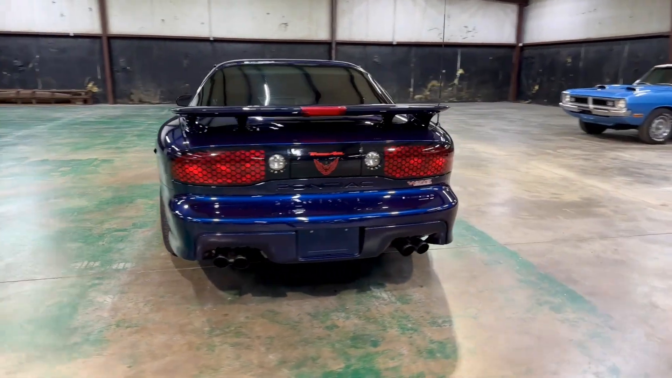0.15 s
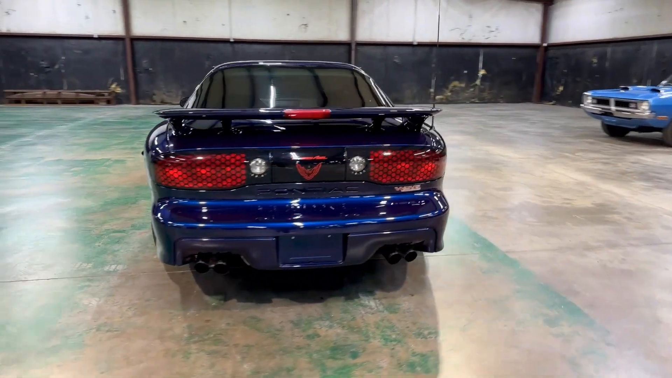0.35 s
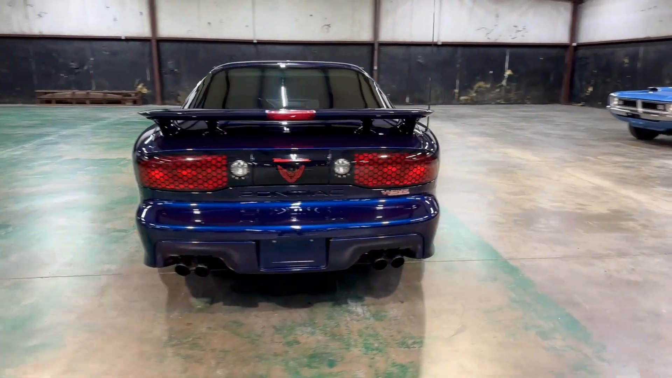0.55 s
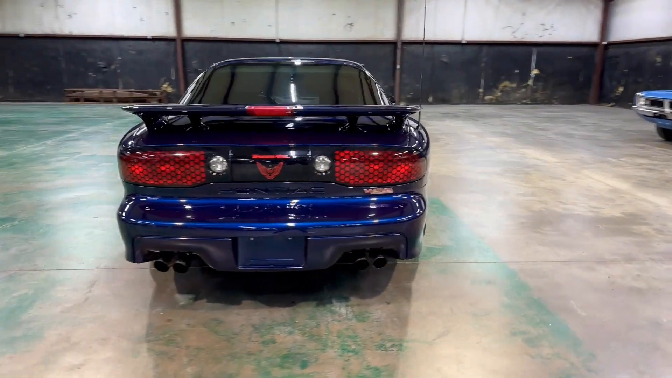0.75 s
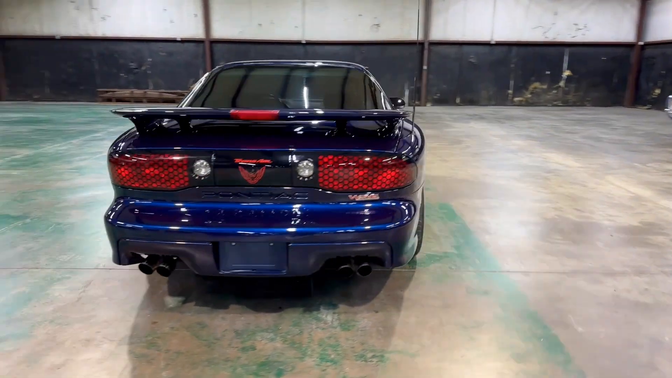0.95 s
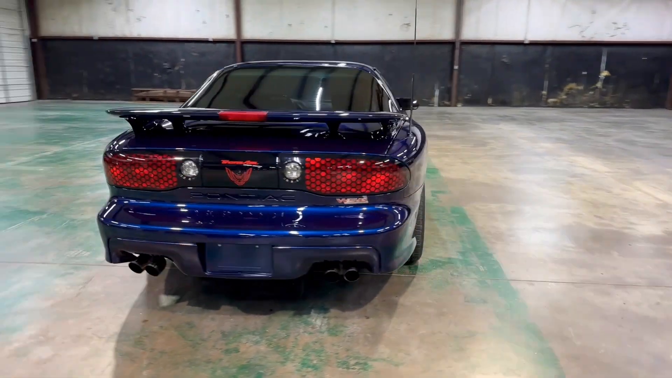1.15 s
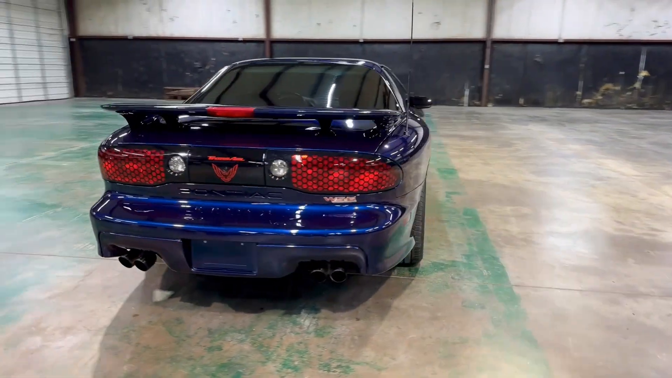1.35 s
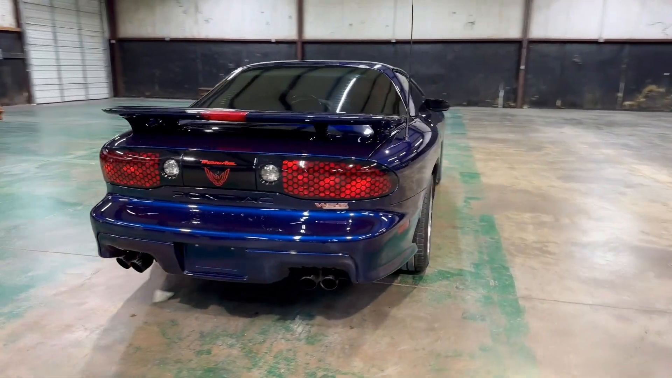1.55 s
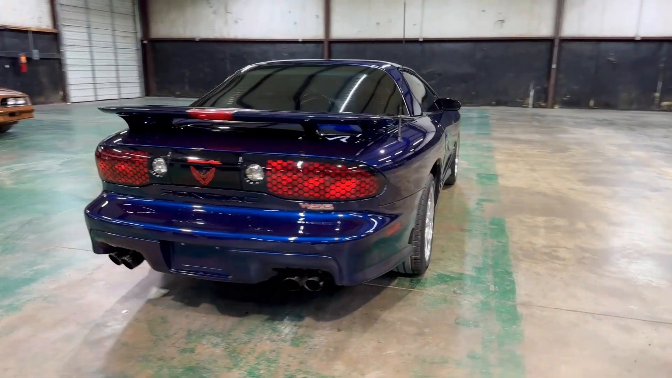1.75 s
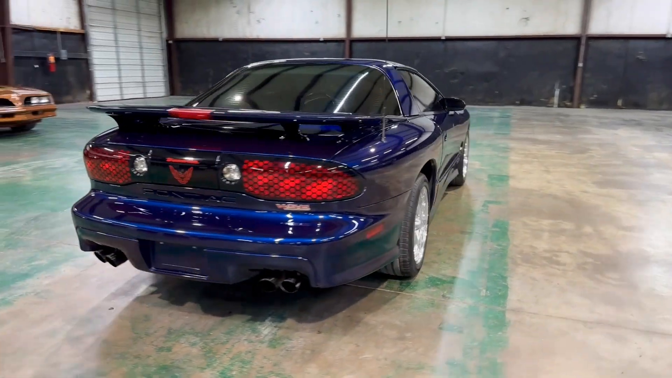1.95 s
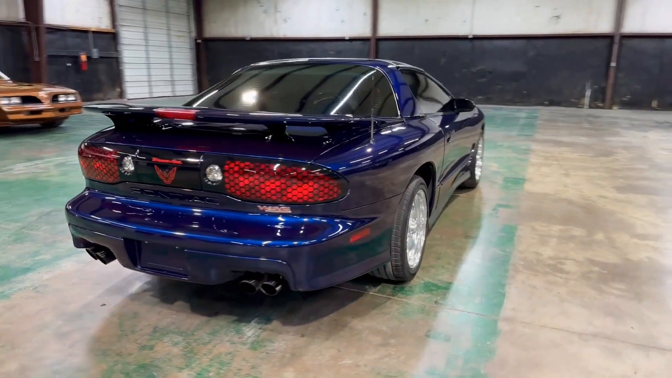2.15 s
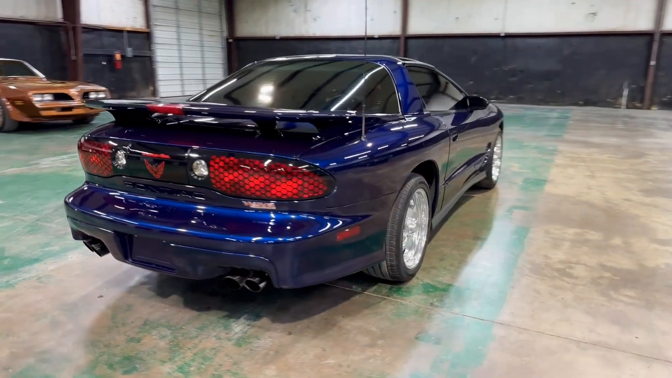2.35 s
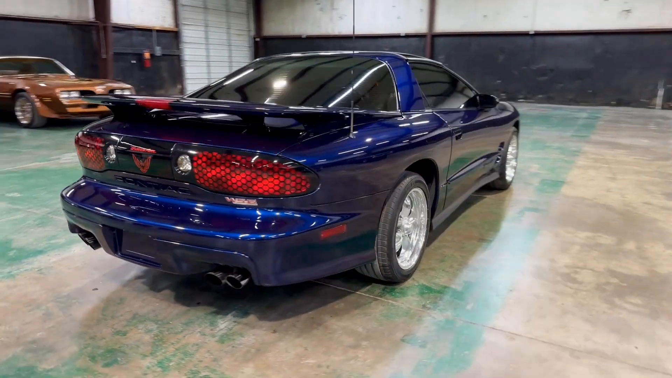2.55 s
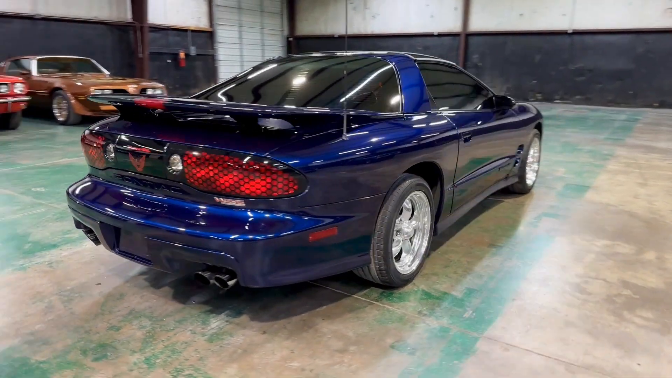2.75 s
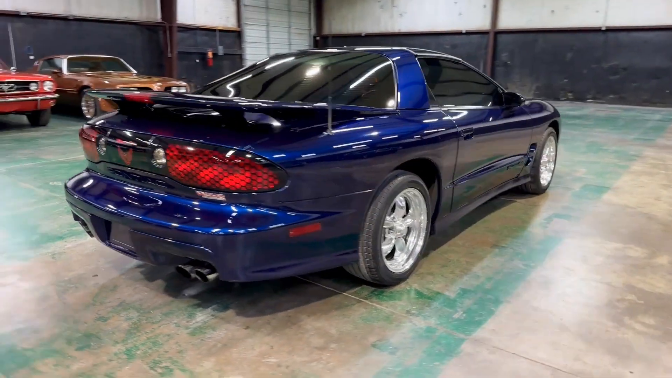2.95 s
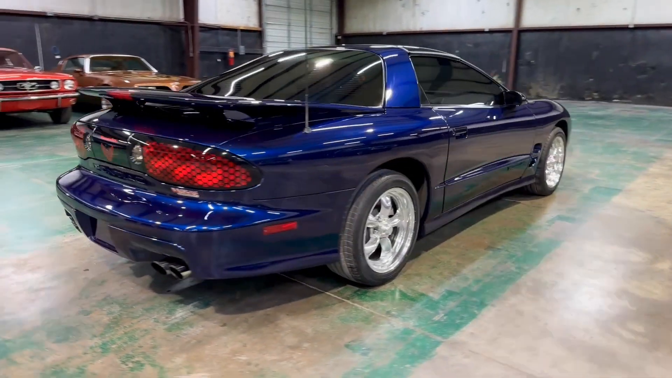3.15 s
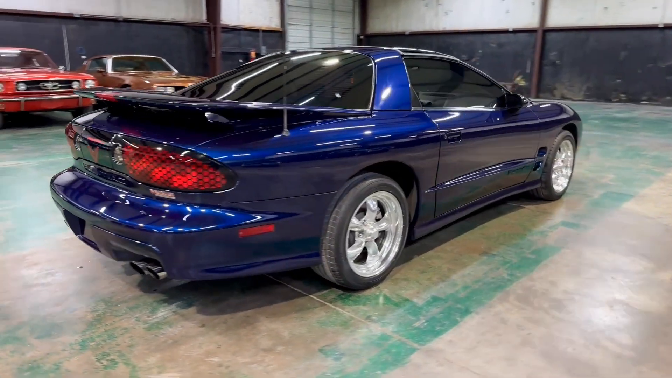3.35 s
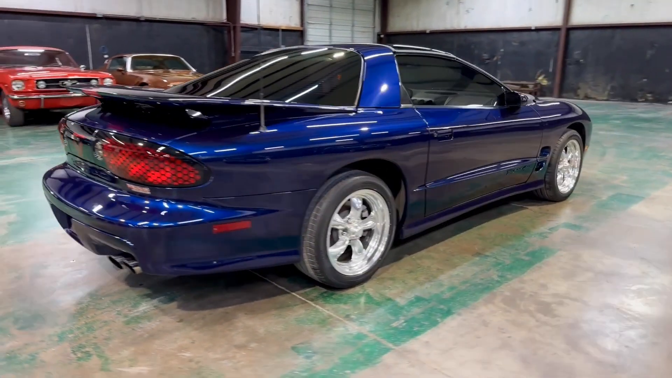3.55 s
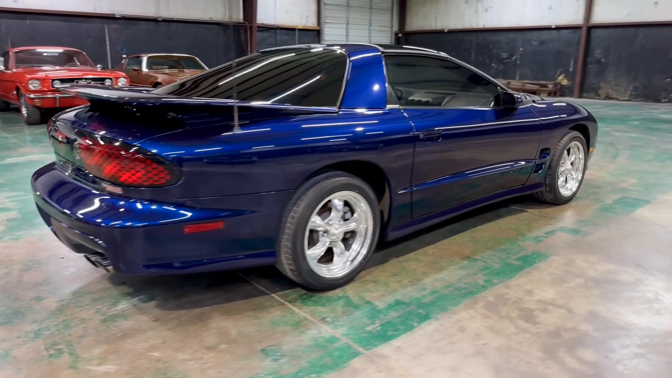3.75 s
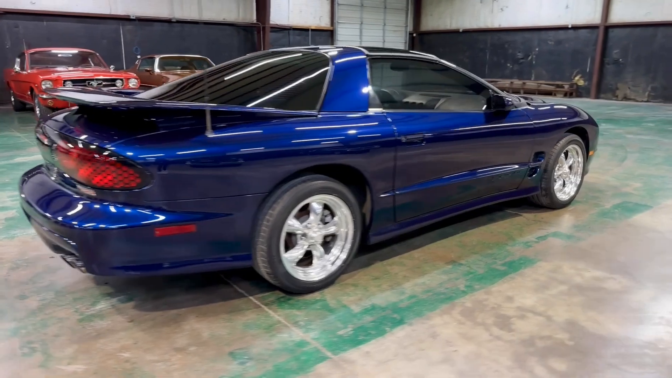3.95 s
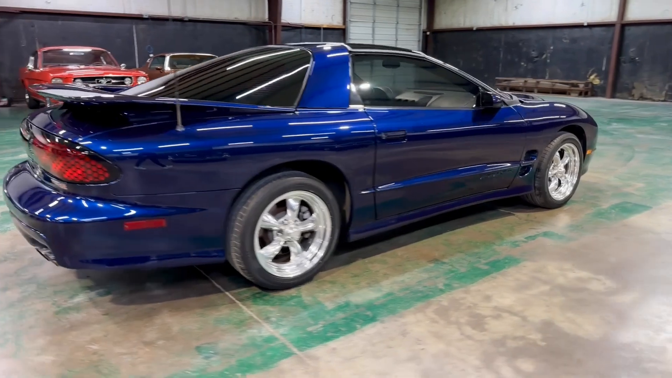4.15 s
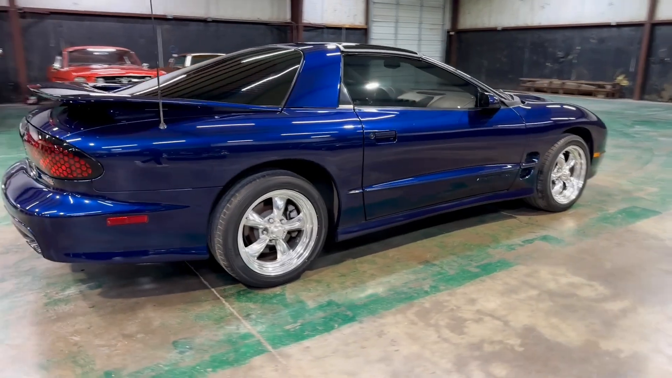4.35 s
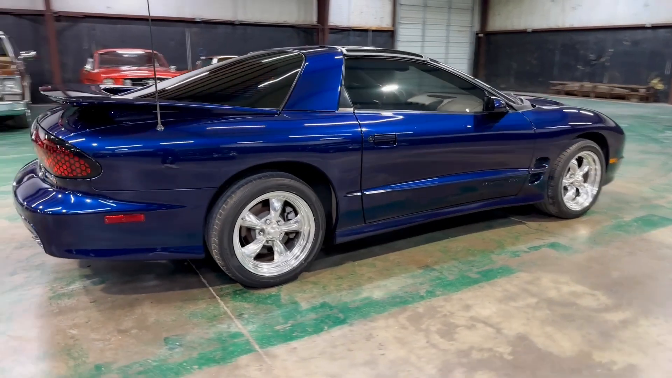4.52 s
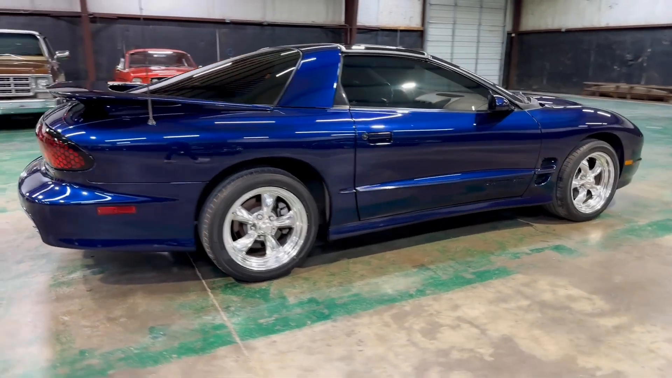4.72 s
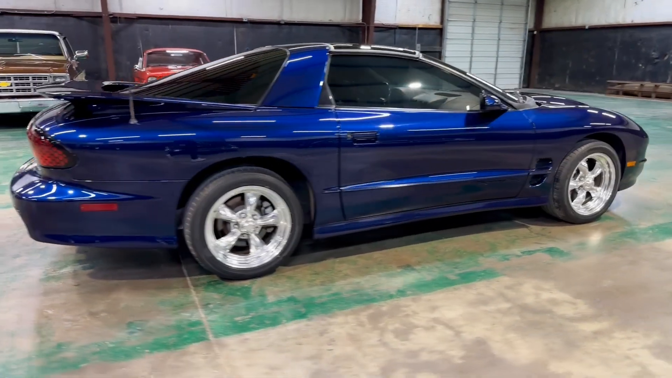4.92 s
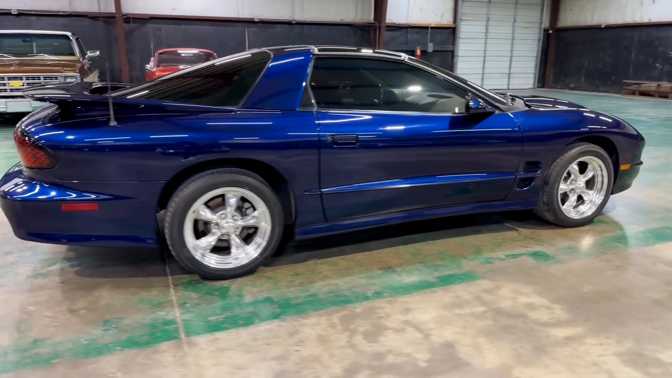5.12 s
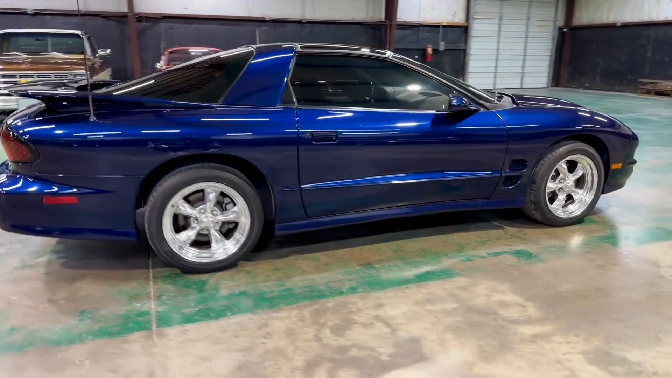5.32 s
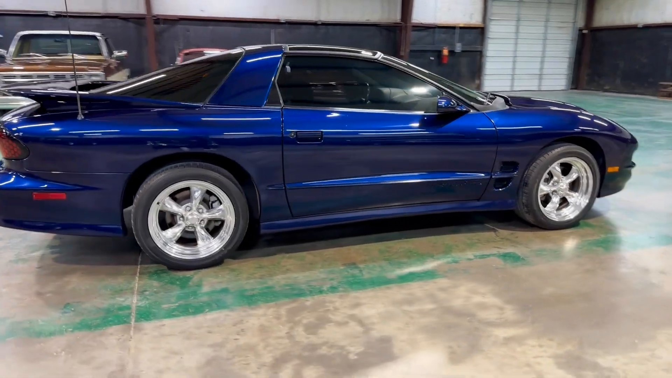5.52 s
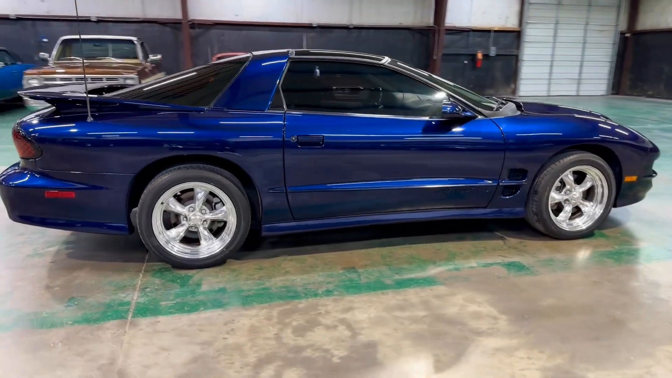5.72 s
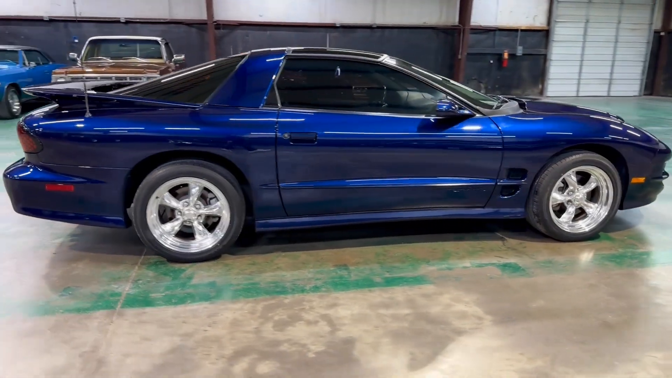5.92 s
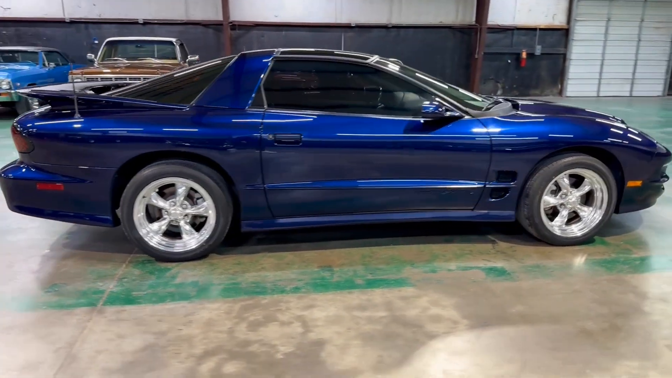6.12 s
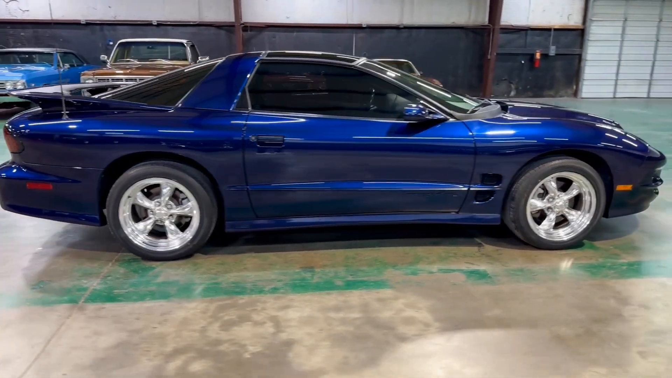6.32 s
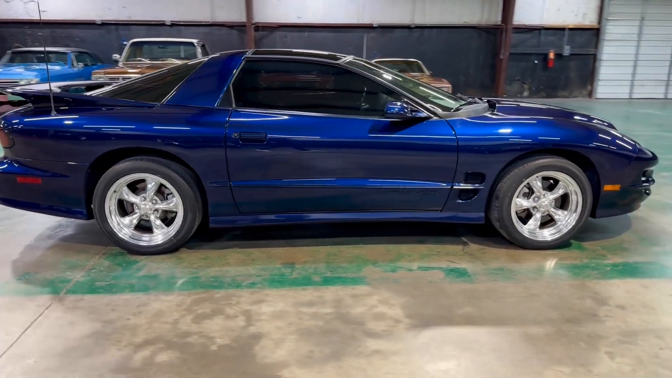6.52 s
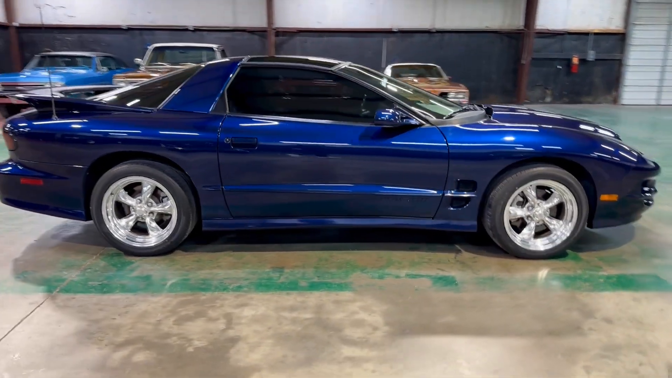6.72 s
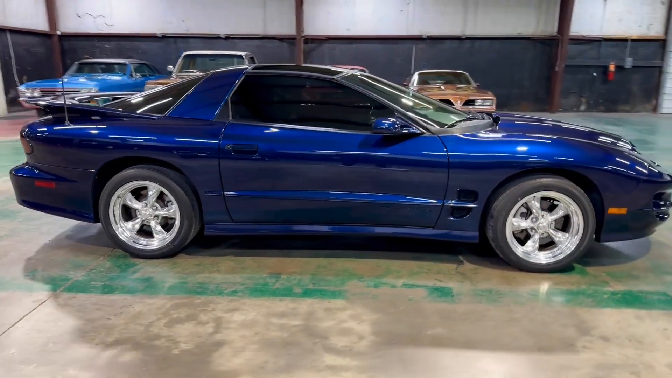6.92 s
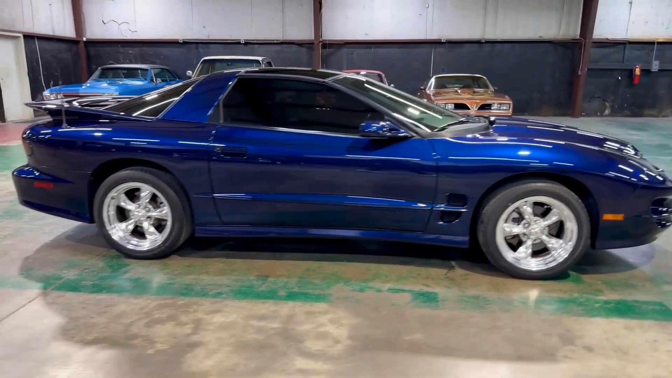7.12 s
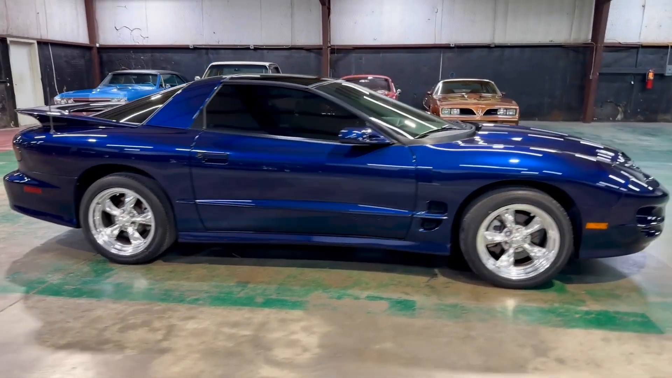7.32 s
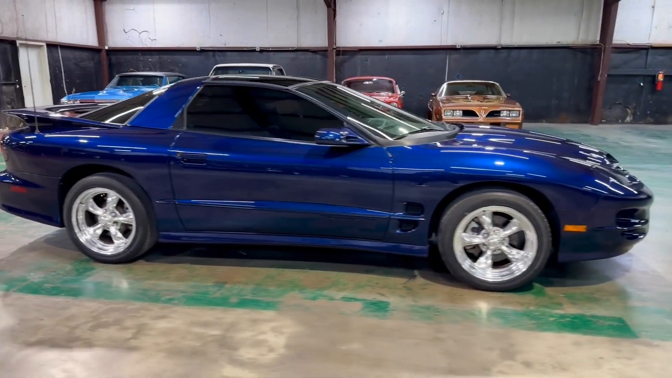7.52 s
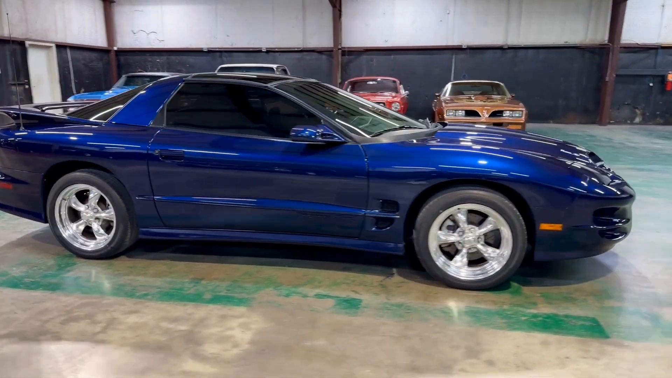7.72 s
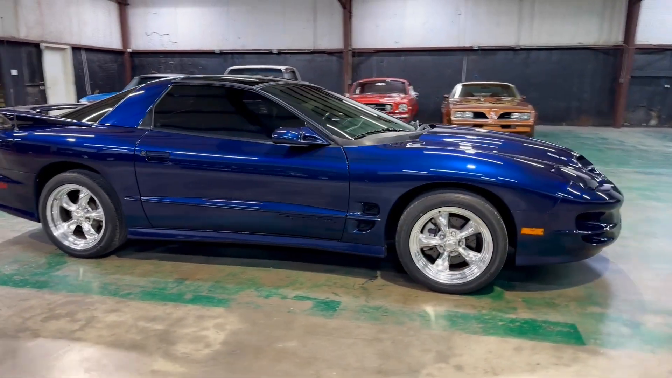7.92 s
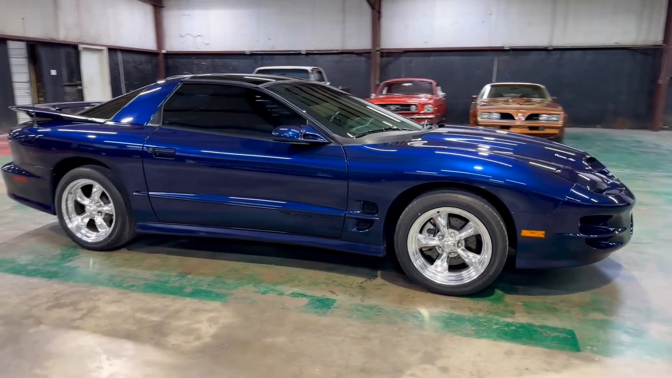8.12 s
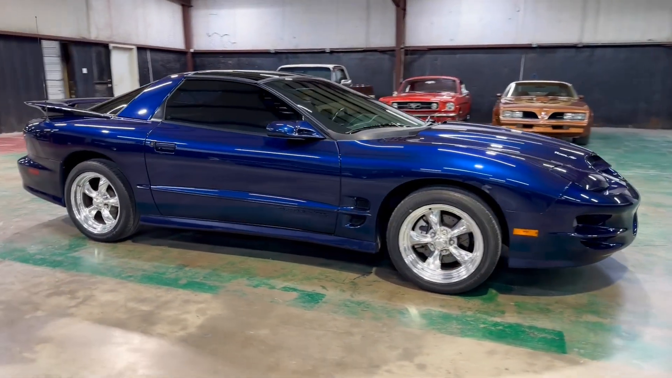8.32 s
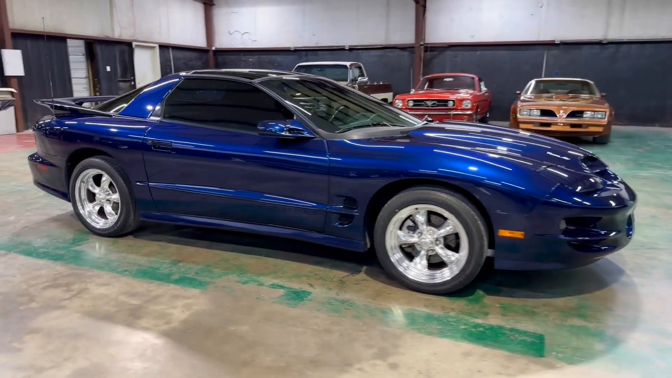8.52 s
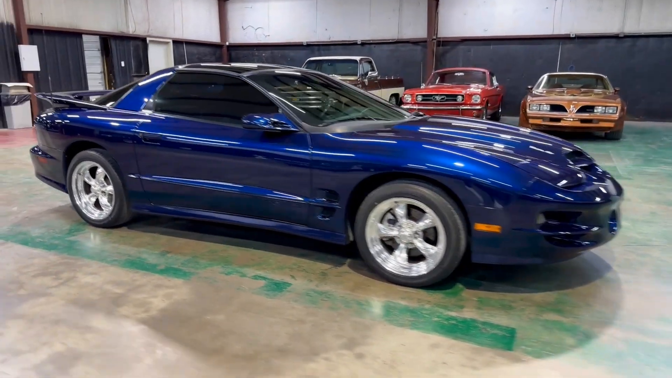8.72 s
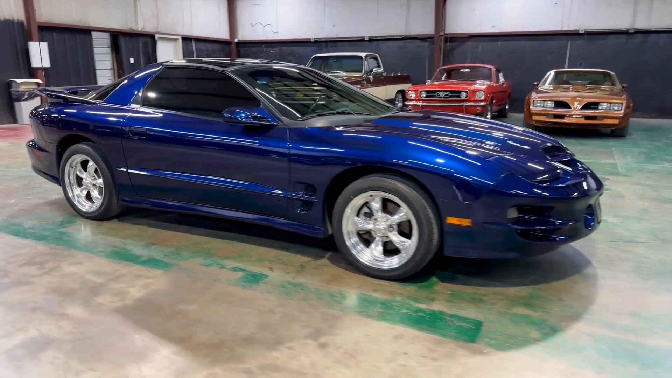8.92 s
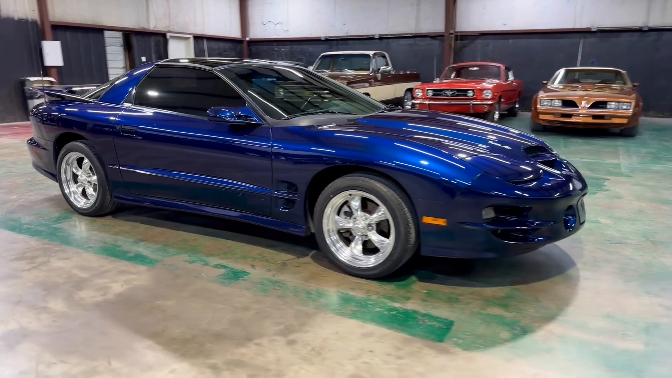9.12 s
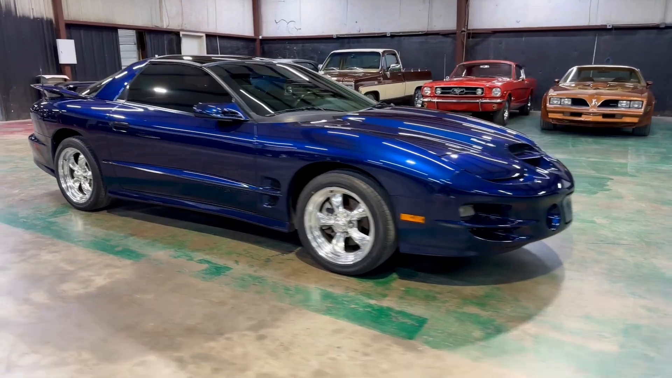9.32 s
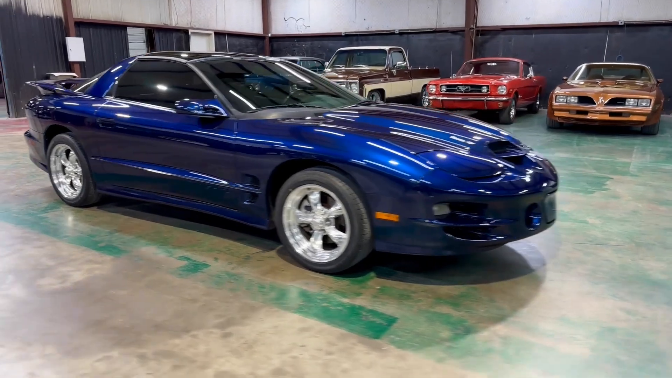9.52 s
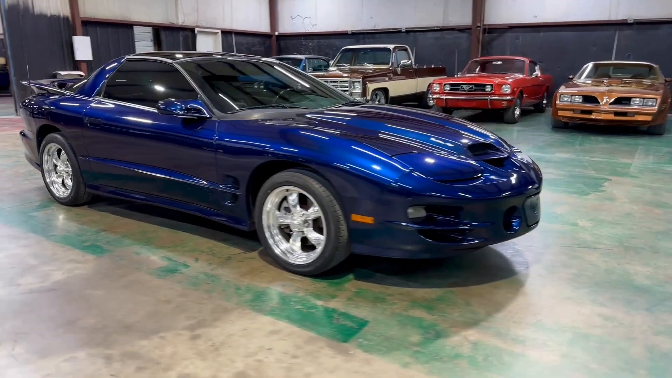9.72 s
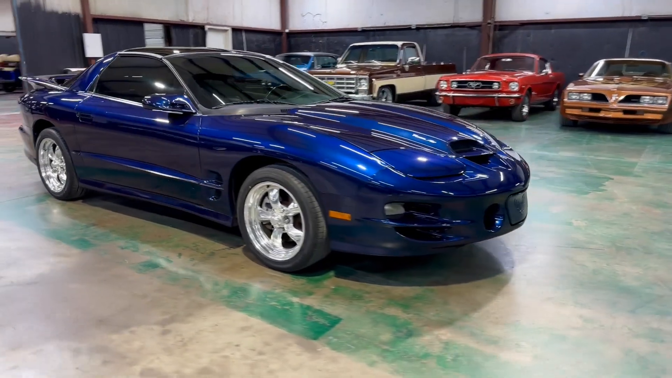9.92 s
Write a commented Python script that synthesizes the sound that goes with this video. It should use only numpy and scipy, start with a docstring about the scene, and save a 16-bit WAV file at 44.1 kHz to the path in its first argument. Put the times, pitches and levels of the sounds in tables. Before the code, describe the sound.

A V8 sports car idles steadily in a hard-floored showroom with a slight echo. The microphone starts behind the tailpipes, where the exhaust is a deep, loping boom, then moves along the side towards the nose. The rumble gradually weakens while belt whirr, hiss and light valve ticking become clearer. A few faint shoe scuffs come in the middle and near the end.

```python
"""A cross-plane V8 idles through a sports exhaust; the microphone walks from tail to nose.
Uneven blow-down pulses ring the pipes and lope once a cycle over a deep firing boom.
Gas spits at the tips. Valves tick and the belt drive hisses, louder towards the bonnet.
The hard-floored showroom adds echoes and standing waves; shoes scuff, air rocks the microphone."""
import sys
import numpy as np
from scipy import signal
from scipy.fft import rfft, irfft, next_fast_len
from scipy.io import wavfile
from scipy.ndimage import uniform_filter1d

SR = 44100
rng = np.random.default_rng(int(sys.argv[2]) if len(sys.argv) > 2 else 0)


def log_audio(samples):
    """Write samples as a 16-bit WAV file to the path given in sys.argv[1]."""
    # one column per channel
    frames = np.atleast_2d(samples).T
    # limit to full scale, then quantise
    limited = np.clip(frames, -1, 1)
    pcm = np.round(limited * 32767).astype(np.int16)
    wavfile.write(sys.argv[1], SR, pcm)


N = 439677
TIME_S = np.arange(N) / SR
N_FFT = next_fast_len(N + 2 * SR)
BINS_HZ = np.arange(N_FFT // 2 + 1) * SR / N_FFT + 1e-3

# idle speed (time [s], firing rate [Hz])
FIRING_RATE = [(0, 61.83), (2.2, 61.41), (3.3, 61.89), (4.7, 60.54), (5.2, 61.29), (9.97, 60.93)]
# cylinders in firing order (pulse lead [ms], relative level [dB])
CYLINDER_PULSES = [(1.9, -1.9), (1.8, -4.4), (-1.6, -2.8), (-1.6, -3.8), (1.7, -4.1), (1, -2.1), (.6, -2),
                   (1.6, 2.5)]
# pipe and silencer modes (centre [Hz], width [Hz], relative gain [dB])
PIPE_MODES = [(46.8, 10, 0), (78, 10, -10), (109, 31, -9), (145.6, 22, -5), (180.1, 10, -.6),
              (187.6, 10, -6), (225.4, 10, -3.8), (236.4, 10, -5), (267, 15, -13.7), (292, 22, -15.5),
              (327.6, 21, -14.5), (382, 25, -26), (440, 22, -20.5), (484, 28, -23.5)]
# travel of each pipe mode via pipe, floor and walls (delay [ms])
MODE_DELAYS_MS = [44.2, 42.2, 45.2, 43.1, 43.9, 41.9, 46.6, 45.4, 48.4, 24.9, 18, 55, 17.6, 12.8]
# exhaust bands (centre [Hz], base level at 1 m [dB], tail-to-nose change [dB], bank cancellation [0-1])
EXHAUST_BANDS = [(85, -22.5, 1, 0), (148, -28.5, 8, 0.35), (200, -24.5, -.5, 0.64),
                 (240, -26.5, -1.5, 0.85), (318.5, -27.5, 0.5, 0.91), (385, -38.2, -6, 0.2),
                 (486, -34.5, -13, 0.58)]
# gas whistle at the tips (centre [Hz], width [Hz], relative level [dB])
GAS_BANDS = [(8700, 2000, 1), (10400, 2000, -4), (12700, 2600, -7.5)]
# engine bay at the microphone, before trim (time [s], whirr [dB], hiss [dB])
BAY_LEVELS = [(0.1, -44.5, -43), (0.88, -43.5, -44.5), (4.99, -43, -40.5), (7.81, -42.5, -40),
              (9.44, -43.5, -38.5), (9.85, -42.5, -37.5)]
# belt whirr (frequency [Hz], relative density [dB])
WHIRR_SPECTRUM = [(250, -15.5), (450, 4.5), (600, -4), (740, -2.5), (850, 0.5), (1030, 0.5), (1170, -1),
                  (1450, -4.5), (2200, -14.5), (4000, -46.5)]
# bay hiss (frequency [Hz], relative density [dB])
HISS_SPECTRUM = [(600, -22), (1400, -4), (2200, 0.5), (3100, 1), (4200, 0.5), (5200, -2.5), (5700, -8),
                 (6700, -9.5), (7300, -12.5), (8100, -13.5), (10000, -21.5), (11700, -28), (13000, -29),
                 (15600, -43.5)]
# covers, injectors, pulleys (centre [Hz], width [Hz], gain at tail [dB], tail-to-nose change [dB])
METAL_MODES = [(726, 65, -1.5, 3), (1157, 38, -3, 0), (1745, 19, -2.5, 7), (1945, 24, 0, 2.5),
               (3514, 40, -10.5, 9.5), (3816, 79, -3.5, 5), (4476, 24, 0, 5), (4965, 60, -5.5, 2),
               (6630, 200, -3.5, 5)]
# pulleys singing out (time [s], half-length [s], pitch [Hz], lift [dB])
PULLEY_SWELLS = [(3.38, .1, 4505, 6), (3.6, .2, 3800, 5), (4.15, .2, 1160, 5), (5.77, .08, 4505, 6),
                 (6.2, .2, 1940, 5), (6.36, .08, 4505, 8), (7, .08, 3800, 5), (8.35, .3, 1940, 7),
                 (9.05, .15, 3500, 6), (9.5, .35, 4505, 4), (9.7, .2, 3800, 4), (9.7, .2, 6580, 5)]
# shoe strokes (time [s], level [dB], decay [s])
SHOE_STROKES = [(3.922, -41, 0.015), (5.228, -36.5, 0.026), (5.49, -38.5, 0.023), (6.4, -39, 0.028),
                (8.887, -41, .012), (9.675, -32.5, 0.01)]
# sole on concrete (frequency [Hz], relative density [dB])
SHOE_SPECTRUM = [(1200, -25), (2300, 11), (3100, 18), (4200, -28), (9000, -21), (15000, -37)]
# air on the microphone (frequency [Hz], relative density [dB])
BUFFET_SPECTRUM = [(2, -14.5), (5, 0.5), (10, 0), (14, -20.5), (19, -13.5), (35, -22.5), (50, -16),
                   (70, -35.5), (200, -78)]
# microphone path (time [s], distance from tips [m], bearing from straight behind [deg])
MIC_PATH = [(0, 2.2, -8.5), (1.1, 2.1, 12), (2, 2.22, 31), (4.3, 2.25, 68.5), (7, 3.86, 92),
            (9.97, 7.3, 158.5)]
# hall nodes and crests on that path (frequency [Hz], time [s], half-width [s], change [dB])
HALL_NODES = [(61, 3.3, 1.0, -4), (61, 5.85, 1.2, -2.5), (122, 4.16, 0.91, -7), (122, 7.04, 1.12, -27),
              (122, 8.76, 0.68, -11), (148, 6, 2.1, -8), (190, 4.1, 0.55, -1.5), (190, 6.3, 0.56, 4.5),
              (240, 4.4, 0.43, 2), (480, 0.84, .3, 2.5), (480, 1.8, .3, -4.5), (480, 5.4, 0.33, 2)]


def blowdown(firings, jitter_ms=.1, scatter_db=.8):
    """One pulse a firing; unequal headers give each cylinder its own delay and strength."""
    times_s = crank_times_s(firings, 1)
    cylinder = (1 + np.arange(len(times_s))) % len(CYLINDER_PULSES)
    lead_ms, level_db = np.array(CYLINDER_PULSES)[cylinder].T
    jitter, scatter = rng.standard_normal((len(times_s), 2)).T
    return clicks(times_s - (lead_ms + jitter_ms * jitter) / 1000, undb(level_db + scatter_db * scatter))


def exhaust(pulses, idle_hz):
    """Pulses and their turbulence ring the pipes; each band beams differently around the car."""
    turbulence = unit(fade(pulses, decay_s=.0077) * noise())
    pipes = sum(undb(db) * resonance(hz, width_hz) * np.exp(-2j * np.pi * BINS_HZ * delay_ms / 1000)
                for (hz, width_hz, db), delay_ms in zip(PIPE_MODES, MODE_DELAYS_MS))
    wet_db = np.interp(TIME_S, [5, 9], [-24, -10])  # more hall as the tips fall behind
    ring = hall(shape(unit(pulses) + undb(-19) * turbulence, pipes), wet_db)
    edges_hz = [30, 130, 165, 212, 272, 350, 420, 560]
    lowpasses = [1 / (1 + (BINS_HZ / hz) ** 16) for hz in edges_hz]
    # notched at the firing rate and its octave, where the boom's two tones sound
    notches = np.prod([1 - np.exp(-((BINS_HZ - k * idle_hz) / 4) ** 4) for k in (1, 2)], axis=0)
    bands = [unit(shape(ring, bandpass * notches)) for bandpass in np.diff(lowpasses, axis=0)]
    return sum(band * from_tips(db + nose_db * towards_nose()) * twin_pipes(hz, cancel) * hall_gain(hz)
               for band, (hz, db, nose_db, cancel) in zip(bands, EXHAUST_BANDS))


def boom(firings, idle_hz):
    """Mean gas flow pulses at the firing rate and its octave; combustion wavers a little."""
    phase_rad = 2 * np.pi * (firings - .09 + .014 * drift(18))

    def tone(harmonic, base_db, beam_db, nose_db):
        level_db = base_db + beam_db * in_beam(half_width_deg=38) + nose_db * towards_nose()
        gain = undb(level_db + .51 * drift(16)) * hall_gain(harmonic * idle_hz)
        return np.sqrt(2) * gain * np.cos(harmonic * phase_rad)

    fundamental = tone(1, base_db=-21.5, beam_db=3.2, nose_db=-4)
    octave = tone(2, base_db=-16, beam_db=4.17, nose_db=-8.5)
    return fundamental + octave


def spit(firings, at_1m_db=-61.5, beam_db=7, jitter_s=.004, scatter_db=2.2, colour_db=3.2):
    """Gas patters at the tips with each firing; every puff has its own strength and colour."""
    times_s = crank_times_s(firings, 1)
    count = len(times_s)
    times_s += jitter_s * rng.uniform(-1, 1, count)
    strength_db = scatter_db * noise(count)
    patter = 0
    for hz, width_hz, db in GAS_BANDS:
        puffs = fade(clicks(times_s, undb(strength_db + colour_db * noise(count))), decay_s=.004)
        patter += undb(db) * unit(shape(puffs * noise(), resonance(hz, width_hz) ** 2))
    return unit(hall(patter, wet_db=-7)) * from_tips(at_1m_db + beam_db * in_beam(half_width_deg=26))


def engine_bay(firings, tick_db=-6.5, hiss_trim_db=.2, whirr_trim_db=1.04):
    """Valves and injectors tick over belt and intake hiss; metal parts ring along."""
    whirr_db, hiss_db = curves(BAY_LEVELS)
    ticks = undb(tick_db) * valves(firings)
    belt = belt_gain(firings)
    hiss = shape(hall(belt * noise() + ticks, wet_db=-9), colour(HISS_SPECTRUM))
    rough_belt = belt * noise() * undb(.35 * np.cos(2 * np.pi * firings) + .7 * drift(35))
    whirr = shape(rough_belt, colour(WHIRR_SPECTRUM))
    bay = unit(hiss) * undb(hiss_db + hiss_trim_db) + unit(whirr) * undb(whirr_db + whirr_trim_db)
    return bay + metal_ring(bay) + injectors(firings) * undb(hiss_db - 30)


def valves(firings, offset_s=.002, scatter_db=4.5):
    """Two ticks a firing; every valve seats at its own crank angle."""
    times_s = crank_times_s(firings, 2)
    valve_count = 2 * len(CYLINDER_PULSES)
    times_s += offset_s * noise(valve_count)[np.arange(len(times_s)) % valve_count]
    impacts = clicks(times_s, undb(scatter_db * noise(len(times_s))))
    return unit(fade(impacts, decay_s=.0071) * noise())


def belt_gain(firings, swish_db=.5, flutter_db=.46):
    """The belt swishes once a trip round the pulleys and flutters three times an engine cycle."""
    swish = np.cos(2 * np.pi * firings / 20.5)
    flutter = np.cos(2 * np.pi * firings * 3 / 8)
    return undb(swish_db * swish + flutter_db * flutter + .21 * drift(11))


def metal_ring(bay):
    """Bay noise rings covers, injectors and pulleys; a mode swells while its pulley sings."""
    rings = 0
    for hz, width_hz, tail_db, nose_db in METAL_MODES:
        singing_db = sum(lift_db * np.exp(-((TIME_S - at_s) / half_s) ** 2)
                         for at_s, half_s, sung_hz, lift_db in PULLEY_SWELLS
                         if abs(sung_hz / hz - 1) < .04)
        gain_db = tail_db + nose_db * towards_nose() + 1.1 * drift(6) + singing_db
        rings += shape(bay, resonance(hz, width_hz)) * undb(gain_db)
    return rings


def injectors(firings, scatter_db=3):
    """Fine, bright chatter, one tick a firing."""
    times_s = crank_times_s(firings, 1)
    envelope = fade(clicks(times_s, undb(scatter_db * noise(len(times_s)))), decay_s=.004)
    return unit(shape(envelope * noise(), resonance(hz=9000, width_hz=3500) ** 2))


def scuffs():
    """Soles brush and tap the concrete."""
    strokes = sum(fade(clicks(np.array([at_s]), undb([db])), decay_s)
                  for at_s, db, decay_s in SHOE_STROKES)
    return strokes * unit(shape(noise(), colour(SHOE_SPECTRUM)))


def buffet(level_db=-26.5):
    """Moving air rocks the microphone, mostly below hearing."""
    return unit(shape(noise(), colour(BUFFET_SPECTRUM))) * undb(level_db)


def hall(x, wet_db, t60_s=.71, gap_s=.015):
    """Direct sound shares its power with three echo tails, whose mix drifts as the microphone moves."""
    age_s = TIME_S[:SR]
    tails = noise((3, SR)) * np.exp(-np.log(1000) * age_s / t60_s) * (age_s > gap_s)
    shares = np.array([drift(1.284) for _ in tails])
    shares /= np.linalg.norm(shares, axis=0)
    echoes = sum(share * shape(x, rfft(tail / np.linalg.norm(tail), N_FFT))
                 for share, tail in zip(shares, tails))
    return (x + undb(wet_db) * echoes) / np.hypot(1, undb(wet_db))


def hall_gain(hz):
    """Standing waves: a low note sinks at each node and swells at each crest."""
    powers = [1 - (1 - undb(db) ** 2) / (1 + ((TIME_S - at_s) / half_s) ** 2)
              for node_hz, at_s, half_s, db in HALL_NODES if abs(node_hz / hz - 1) < .11]
    return np.sqrt(np.prod(powers, axis=0))


def twin_pipes(hz, cancel, spacing_m=1.21):
    """The banks lope in opposition, partly cancelling where their paths differ by whole wavelengths."""
    _, bearing_deg = curves(MIC_PATH)
    lag_s = spacing_m * np.sin(np.radians(bearing_deg)) / 343
    return np.sqrt(1 - cancel * np.cos(2 * np.pi * hz * lag_s))


def from_tips(at_1m_db):
    """Gain after spherical spreading from the tailpipes."""
    distance_m, _ = curves(MIC_PATH)
    return undb(at_1m_db) / distance_m


def in_beam(half_width_deg):
    """1 straight behind the tailpipes, near 0 beside the car."""
    _, bearing_deg = curves(MIC_PATH)
    return 1 / (1 + (bearing_deg / half_width_deg) ** 6)


def towards_nose():
    """0 straight behind the car, 1 straight in front."""
    _, bearing_deg = curves(MIC_PATH)
    return np.abs(bearing_deg) / 180


def crank_times_s(firings, per_firing):
    """Times at which the crank passes evenly spaced marks."""
    marks = np.arange(1, int(firings[-1] * per_firing)) / per_firing
    return np.interp(marks, firings, TIME_S)


def undb(db):
    """Decibels to gain."""
    return 10 ** (np.asarray(db) / 20)


def unit(x):
    """Scale to rms 1."""
    return x / np.sqrt(np.mean(x ** 2))


def noise(size=N):
    """White Gaussian noise, spread 1."""
    return rng.standard_normal(size)


def drift(rate_hz):
    """Smooth random drift, spread near 1."""
    hold = int(SR / rate_hz)
    steps = noise(N // 100)[np.arange(N) // hold]
    return 1.3 * uniform_filter1d(uniform_filter1d(steps, hold), hold)


def curves(table):
    """Columns of a timed table, per sample."""
    times_s, *columns = np.transpose(table)
    return [np.interp(TIME_S, times_s, column) for column in columns]


def shape(x, response):
    """Apply a frequency response."""
    return irfft(rfft(x, N_FFT) * response, N_FFT)[:N]


def colour(points):
    """Response through (frequency [Hz], gain [dB]) points."""
    hz, db = np.transpose(points)
    return undb(np.interp(np.log(BINS_HZ), np.log(hz), db))


def resonance(hz, width_hz):
    """Response of one damped mode, gain 1 at centre."""
    return 1 / (1 + 1j * (BINS_HZ ** 2 - hz ** 2) / (BINS_HZ * width_hz))


def clicks(times_s, gains):
    """One impulse at each time."""
    inside = (times_s >= 0) & (times_s < TIME_S[-1])
    return np.bincount((times_s[inside] * SR).astype(int), gains[inside], N)


def fade(x, decay_s):
    """Exponential tail on each impulse."""
    return signal.lfilter([1], [1, -np.exp(-1 / (decay_s * SR))], x)


def scene():
    """One crankshaft drives every engine sound; shoes and air lie behind."""
    firing_hz, = curves(FIRING_RATE)
    idle_hz = np.mean(firing_hz)
    firings = np.cumsum(firing_hz) / SR
    tailpipes = boom(firings, idle_hz) + exhaust(blowdown(firings), idle_hz) + spit(firings)
    return (tailpipes + engine_bay(firings) + scuffs() + buffet())[None]


def record(dry):
    """Steep low-pass on the top treble."""
    cutoff_hz = 15650
    return signal.sosfilt(signal.ellip(10, .1, 80, cutoff_hz, fs=SR, output="sos"), dry)


dry = scene()
out = record(dry)
log_audio(out)
```